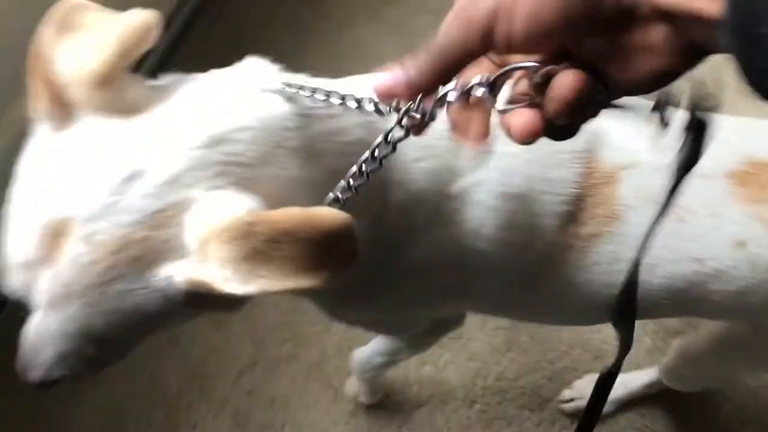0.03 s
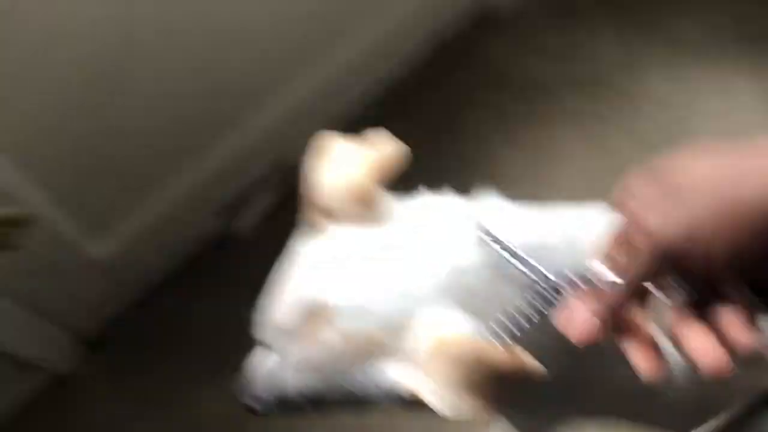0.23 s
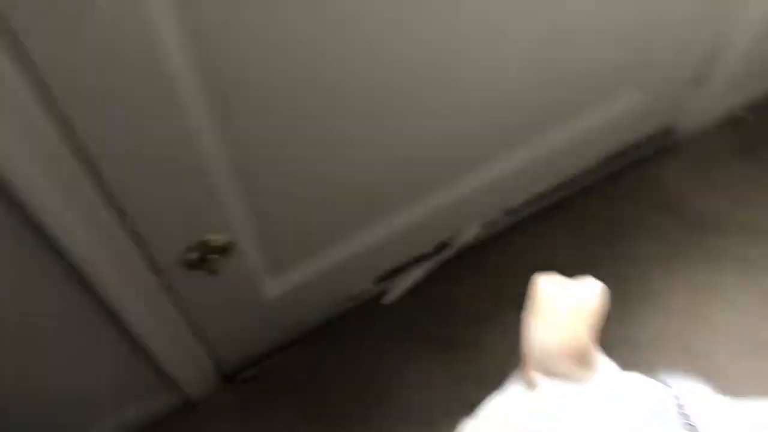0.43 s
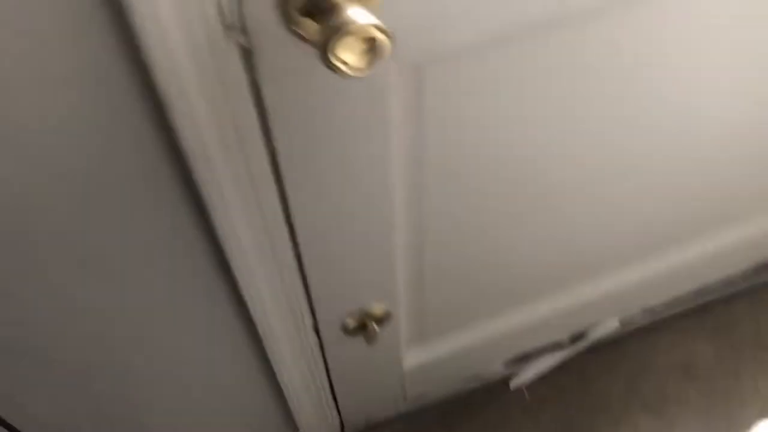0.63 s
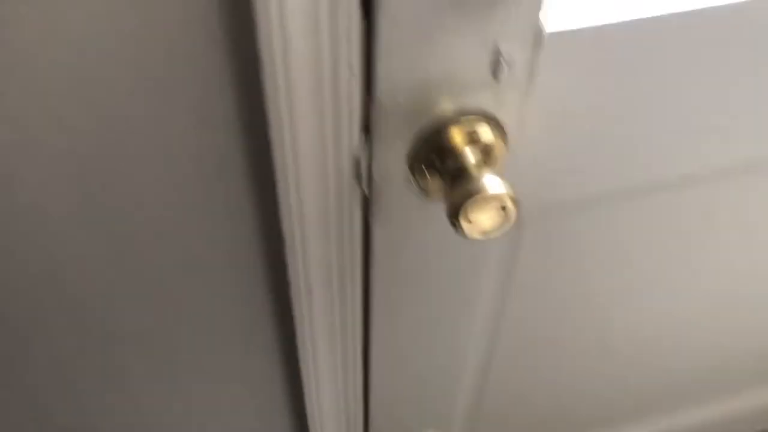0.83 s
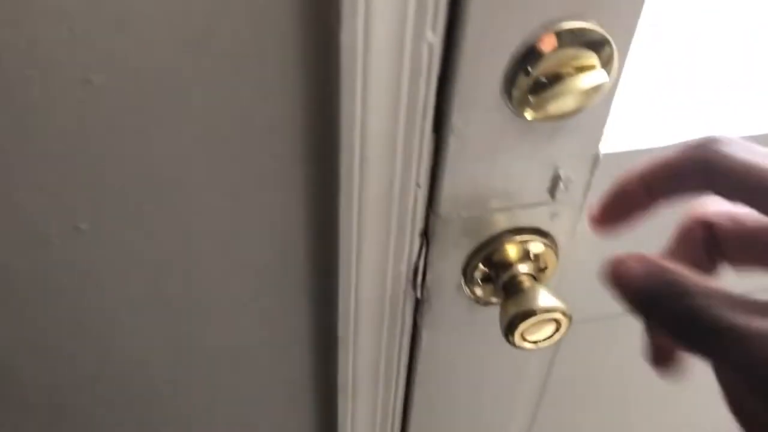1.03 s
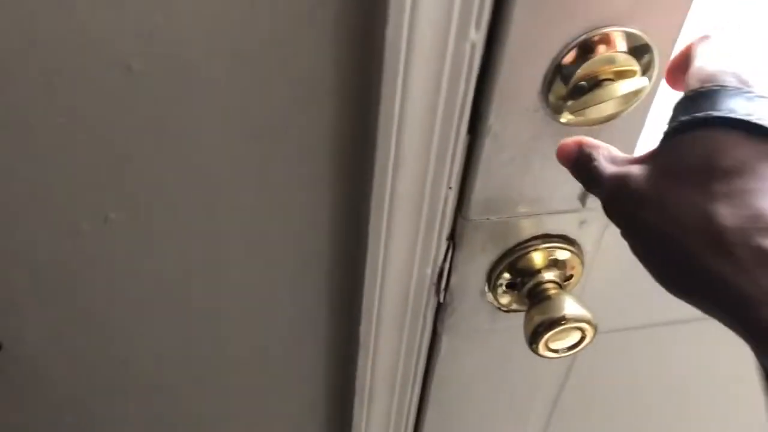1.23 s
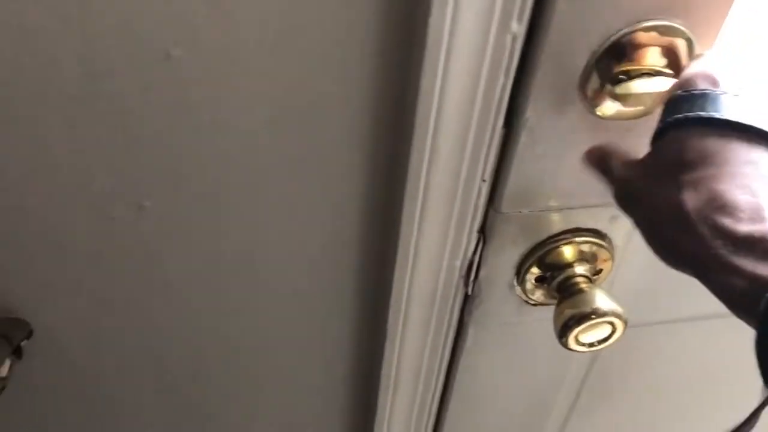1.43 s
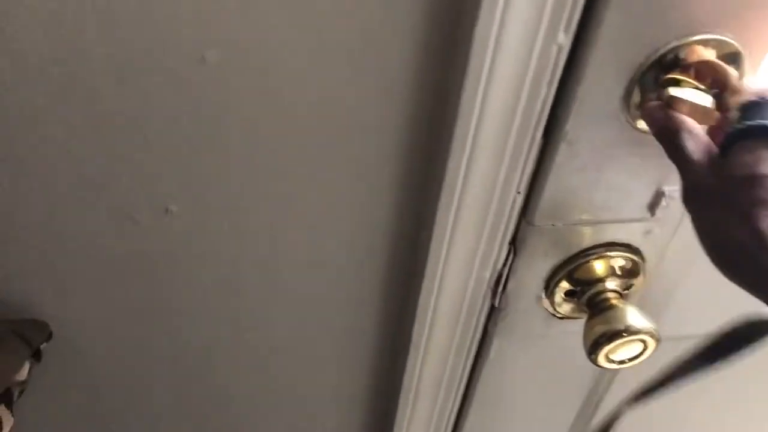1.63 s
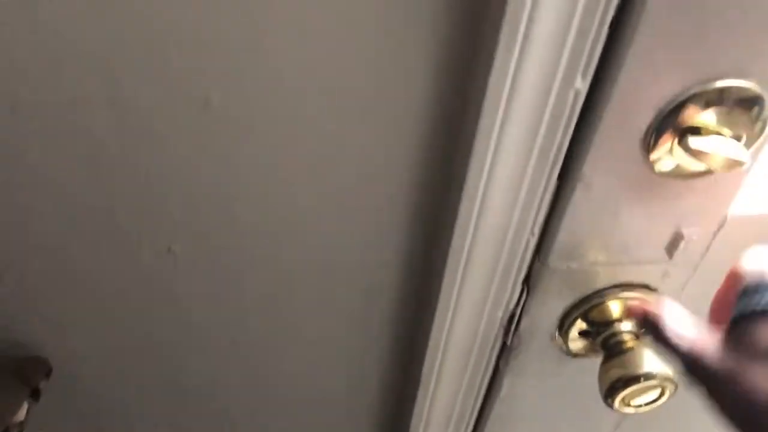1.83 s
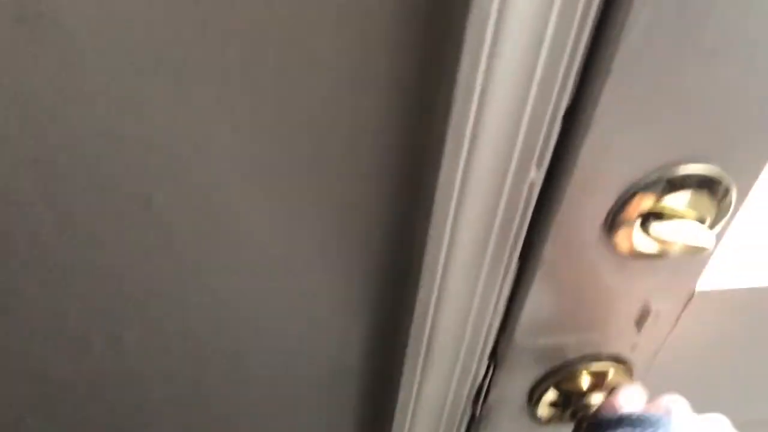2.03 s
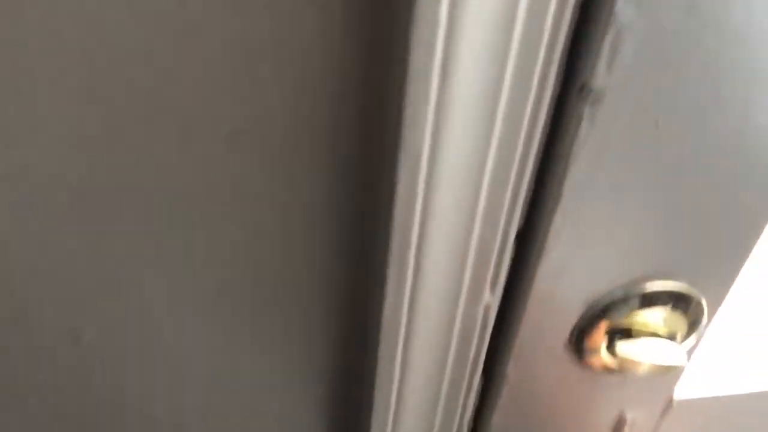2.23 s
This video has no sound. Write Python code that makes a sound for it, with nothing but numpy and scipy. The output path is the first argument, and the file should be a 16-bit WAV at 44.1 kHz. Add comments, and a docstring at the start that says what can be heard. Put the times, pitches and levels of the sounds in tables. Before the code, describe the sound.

A dog's metal chain collar clinks and snaps taut, then a deadbolt clicks open.

```python
"""Small metal ticks, sharp snaps and a high ping, then the clicks and wooden knocks of a door lock.
A dog's chain collar is pulled up by its leash: links tick, snap taut, slide and strike a steel ring.
A hand then turns a deadbolt, whose brass parts ring while the bolt knocks in the wooden door.
All is close by, in a small carpeted hall with a low ventilation rumble."""
import sys
import numpy as np
from scipy import signal
from scipy.fft import rfft, irfft
from scipy.io import wavfile
from scipy.ndimage import uniform_filter1d

SR = 44100
rng = np.random.default_rng(int(sys.argv[2]) if len(sys.argv) > 2 else 0)


def to_wav(s):
    """Save 16-bit WAV."""
    ch = np.atleast_2d(s).T  # columns
    pcm = np.round(np.clip(ch, -1, 1) * 32767)  # PCM
    wavfile.write(sys.argv[1], SR, pcm.astype(np.int16))


N = 100680
TIME = np.arange(N) / SR
BLOW_TIME = np.arange(8192) / SR


def amp(db):
    """Turns decibels into a gain."""
    return 10 ** (np.asarray(db) / 20)


def fade(t, ring_s):
    """A dying vibration: it falls by 60 dB in one ring time."""
    return np.exp(-np.log(1000) * t / ring_s)


def unit_rms(x):
    """Scales a sound to an average (rms) strength of one."""
    return x / np.sqrt(np.mean(x ** 2) + 1e-20)


def look_up(points, hz):
    """Reads between the rows of a table, on a log-frequency axis."""
    f, value = np.transpose(points)
    return np.interp(np.log(hz + 1), np.log(f + 1), value)


def level(points):
    """Gain over time from rows of t/s, level/dB."""
    return amp(np.interp(TIME, *np.transpose(points)))


def add(mix, start_s, sound):
    """Mixes a sound in at its start time."""
    part = mix[max(round(start_s * SR), 0):][:len(sound)]
    part += sound[:len(part)]


def coloured(x, spectrum):
    """Gives noise a tone colour, at an rms of one."""
    gain = amp(look_up(spectrum, np.fft.rfftfreq(len(x), 1 / SR)))
    return unit_rms(irfft(rfft(x) * gain, len(x)))


def resonance(centre_hz, height_db, octaves, tilt=0, pivot_hz=3000):
    """A bump in the tone colour, on a slope of tilt dB per octave."""
    def gain_db(hz):
        bump = height_db * np.exp(-.5 * (np.log2(hz / centre_hz) / octaves) ** 2)
        return bump + tilt * np.log2(np.maximum(hz / pivot_hz, 1 / 8))
    return gain_db


def resonate(x, spectrum):
    """Filters a burst so that its resonances ring after it, never before."""
    log_gain = np.log(amp(look_up(spectrum, abs(np.fft.fftfreq(len(x), 1 / SR)))))
    response = np.exp(np.conj(signal.hilbert(log_gain)))
    return np.fft.ifft(np.fft.fft(x) * response).real


def strike(modes, contact, contact_db, ring_s, emphasis=lambda hz: 0, body_db=0):
    """One blow: a sharp click, dying chatter and the object's own tones (its modes)."""
    t = BLOW_TIME
    bands = np.geomspace(100, 17000, 240)
    # the chatter is up to body_db louder near each mode
    bumps = [resonance(hz, body_db, octaves=.06)(bands) for hz, _, _ in modes]
    body = np.max([0 * bands] + bumps, axis=0)
    colour = np.column_stack([bands, look_up(contact, bands) + body + emphasis(bands)])
    click = amp(1) * np.exp(-t / .0005)
    envelope = (click + fade(t, ring_s)) * np.minimum(t / .0004, 1)
    chatter = resonate(envelope * rng.standard_normal(len(t)), colour)
    chatter *= amp(contact_db) * np.linalg.norm(envelope) / np.linalg.norm(chatter)
    tones = sum((-1) ** k * amp(db + emphasis(hz)) * fade(t, ring_s * life) * np.sin(2 * np.pi * hz * t)
                for k, (hz, db, life) in enumerate(modes))
    return chatter + tones


def background():
    """The ventilation rumbles and hums under the faint hiss of the hall."""
    # colour of the rumble and of the hiss: f/Hz, level/dB
    rumble_colour = [(40, -28), (58, -5), (80, 0.5), (130, -0.5), (180, -7.5), (290, -14.5), (380, -20.5),
                     (600, -29), (1100, -26), (2000, -36), (6000, -71.5)]
    hiss_colour = [(200, 9.5), (1500, 4.5), (3000, 1.5), (6000, -3), (10000, -9.5), (15500, -12)]
    # narrow bands of noise that make a wavering hum: f/Hz, width/Hz, level/dB
    hum_bands = [(81.5, 18.6, -49.5), (277.2, 27, -53.5), (444.6, 19, -66.5)]
    # loudness of the hiss: t/s, level/dB
    hiss_levels = [(0, -67), (1.1, -57), (1.32, -55.5), (1.72, -60.5), (2.05, -57.5), (2.28, -53)]
    hz = np.fft.rfftfreq(N, 1 / SR)
    hum = np.zeros(N)
    for centre_hz, width_hz, db in hum_bands:
        peak = 1 / (1 + (2 * (hz - centre_hz) / width_hz) ** 2)
        hum += amp(db) * unit_rms(irfft(rfft(rng.standard_normal(N)) * peak, N))
    rumble = amp(-40.5) * coloured(rng.standard_normal(N), rumble_colour)
    hiss = level(hiss_levels) * coloured(rng.standard_normal(N), hiss_colour)
    return rumble + hum + hiss


def hall(x, wet_db):
    """Adds the hall's short wash of echoes, in which the treble dies first."""
    # how long the hall rings: f/Hz, ring time/s
    ring_times = [(200, 0.45), (2000, 0.48), (7000, 0.19), (15000, 0.21)]
    hz, t, noise = signal.stft(rng.standard_normal(SR // 2), SR, nperseg=256)
    tail = signal.istft(noise * fade(t, look_up(ring_times, hz)[:, None]), SR, nperseg=256)[1]
    tail *= np.minimum(np.arange(len(tail)) / SR / .001, 1)  # builds up in 1 ms
    return x + amp(wet_db) * signal.fftconvolve(x, tail / np.linalg.norm(tail))[:N]


def first_echoes(x):
    """Adds the sound that bounces straight back from hand, door and walls."""
    # echoes: delay/s, level/dB
    echoes = [(.0017, -18), (0.0113, -22), (0.0142, -17.5)]
    out = x.copy()
    for delay_s, db in echoes:
        add(out, delay_s, amp(db) * x)
    return out


def sliding():
    """Chain and leash slide over fur and hand: many tiny contacts and a smooth rub."""
    # loudness of the slide: t/s, level/dB
    slide_levels = [(0, -53), (.12, -55.5), (.27, -55), (.33, -60), (.44, -53.5), (.53, -56), (.58, -56),
                    (.62, -40), (.68, -46), (.76, -48.5), (.83, -50.5), (.94, -46), (1.04, -59.5),
                    (1.15, -90)]
    # its colour: f/Hz, level/dB
    slide_colour = [(150, 8), (450, 3.5), (1500, 3.5), (3000, 5), (6000, 1), (9000, -0.5), (12000, -3),
                    (15000, -6.5)]
    contacts_per_s, spread_db = 1400, 4
    sizes = amp(spread_db * np.minimum(rng.exponential(1, N), 5)) * rng.choice([-1, 1], N)
    contacts = unit_rms(sizes * (rng.random(N) < contacts_per_s / SR))
    rub = rng.standard_normal(N)
    return level(slide_levels) * coloured(contacts + rub, slide_colour)


def links():
    """Slack links tick against each other, dulled by hand and fur, each with its own colour."""
    # link hits link: t/s, level/dB, resonance/Hz, ring time/s
    ticks = [(0.0757, -34, 13200, 0.013), (0.1333, -23, 5400, 0.018), (0.1512, -22.5, 7360, 0.017),
             (0.2174, -33, 13500, 0.0082), (0.2233, -23.5, 11000, 0.031), (0.2299, -20, 7900, 0.017),
             (0.2643, -34.5, 10200, 0.012), (0.2943, -37.5, 10300, 0.018), (0.4492, -31.5, 10700, 0.023),
             (0.46, -23.5, 10800, 0.017), (0.636, -45, 2400, 0.011), (0.698, -37, 5400, 0.021),
             (0.7148, -27.5, 2690, 0.026), (0.7359, -30.5, 2780, 0.015), (0.75, -37, 3010, .03),
             (0.7575, -31, 2840, 0.03), (0.775, -33.5, 3200, 0.02), (0.8407, -32, 10900, 0.011),
             (0.875, -31, 2600, 0.032), (0.8961, -27, 3320, 0.017), (.9144, -23, 3220, 0.014),
             (0.92, -26, 3280, 0.016), (0.9224, -25.5, 12500, 0.023), (1.4892, -42, 12000, .015),
             (1.514, -27.5, 14600, 0.01), (1.798, -42, 11300, 0.0091)]
    # colour of their contact noise: f/Hz, level/dB
    contact = [(300, -34), (1200, -12.5), (2300, -6.5), (4500, -2), (7000, -4), (12500, -3.5), (15200, 0.5),
               (16300, -1)]
    out = np.zeros(N)
    for start_s, db, centre_hz, ring_s in ticks:
        emphasis = resonance(centre_hz, height_db=9, octaves=.37)
        add(out, start_s, strike([], contact, db, ring_s, emphasis))
    return out


def fluttering(hz, flutter_hz):
    """A tone of the steel ring, whose pitch trembles as it swings against the chain."""
    wobble = unit_rms(uniform_filter1d(rng.standard_normal(N), round(.004 * SR)))
    return np.sin(2 * np.pi * np.cumsum(hz + flutter_hz * wobble) / SR)


def steel_ring():
    """A hanging ring sings on two close tones; each blow feeds them, and a leaning link chokes them."""
    # blows on the ring: t/s, level/dB, ring time/s, upper tone against lower/dB
    pings = [(.5865, -23.5, 0.036, 4), (0.698, -36.5, 0.12, 2), (0.7149, -22, 0.093, 2.5),
             (.748, -39, 0.12, 1), (0.7576, -33.5, 0.09, 8), (0.772, -33, 0.1, 6), (.778, -34, 0.11, -3),
             (0.786, -22, .07, -5), (0.79, -19.5, 0.08, -7), (0.842, -29.5, 0.022, 9.5),
             (0.8959, -24, 0.032, 0), (0.914, -24, 0.029, 3), (0.921, -24, 0.035, 4),
             (1.488, -36.5, 0.051, 3), (1.515, -12, 0.015, -25), (1.799, -40, 0.015, 8)]
    choke_times_s, choke_ring_s = [.741, .68], .042
    lower, upper, t = np.zeros(N), np.zeros(N), BLOW_TIME
    for start_s, db, ring_s, upper_db in pings:
        choked_s = sum(np.maximum(start_s + t - at, 0) for at in choke_times_s if at > start_s)
        blow = amp(db) * np.minimum(t / .0008, 1) * fade(choked_s, choke_ring_s)
        add(lower, start_s, blow * fade(t, ring_s))
        add(upper, start_s, blow * amp(upper_db) * fade(t, .36 * ring_s))
    return lower * fluttering(10290, flutter_hz=25) + upper * fluttering(10700, flutter_hz=45)


def snaps():
    """The chain runs to its end and rings briefly while pulled tight."""
    # tugs: t/s, level/dB, brightness/(dB per octave), ring time/s, resonance/Hz
    tugs = [(0.3817, -7, 5, 0.015, 7800), (0.5861, -8.5, -2, 0.017, 4600)]
    # tones of the tight chain: f/Hz, level/dB, ring time as a multiple of the tug's
    modes = [(4580, -20, .8), (4860, -19, .8), (7680, -15, 1.3), (13100, -19, .8), (13700, -22, .8),
             (14620, -15, .7), (15200, -14.5, .7)]
    # colour of its contact noise: f/Hz, level/dB
    contact = [(300, -22), (1400, -21), (2300, -9), (3500, -8.5), (5400, -6), (12000, -4), (15200, 5),
               (16300, -9)]
    out = np.zeros(N)
    for start_s, db, tilt, ring_s, centre_hz in tugs:
        emphasis = resonance(centre_hz, height_db=6, octaves=.13, tilt=tilt, pivot_hz=9150)
        snap = strike(modes, contact, contact_db=-4.5, ring_s=ring_s, emphasis=emphasis)
        add(out, start_s, amp(db) * snap)
    return out


def deadbolt():
    """The brass lock rings as it springs free, and clacks dully when the bolt presses on the door."""
    # moves of the bolt: t/s, metal level/dB, resonance/Hz, brightness/(dB per octave),
    # ring time/s, gain of the brass tones/dB, knock level/dB
    moves = [(1.409, -20, 3350, -4, 0.027, 4.5, -38.5), (1.426, -44, 3000, -5, 0.016, -8, -34),
             (1.4548, -32.5, 2980, -2.5, 0.011, -14, -51), (1.4575, -30, 1500, -14, 0.0091, -14, -19.5),
             (1.47, -39, 2500, -8, 0.023, -18, -47), (1.513, -27.5, 2950, 5, 0.046, -11, -25.5),
             (1.5838, -12.5, 3500, -0.5, 0.019, 3, -37), (1.598, -26.5, 5300, -8, 0.034, -23, -37),
             (1.606, -30, 5340, -1, 0.023, -12, -35), (1.615, -16, 4960, 1, 0.036, -26, -23),
             (1.6238, -26, 5200, -6, 0.043, -16, -25.5)]
    # tones of the lock and of the wooden door: f/Hz, level/dB, ring time as a multiple of the blow's
    lock_modes = [(1310, -19, 1.1), (1886, -10.5, .8), (2950, -12, .85), (3780, -11, .7)]
    door_modes = [(275, -17, 3), (445, -14, 0.8), (790, -8.5, 0.5), (1020, -9, 0.3)]
    # colour of their contact noise: f/Hz, level/dB
    lock_contact = [(300, -6.5), (1000, -6.5), (1900, 1.5), (3200, -6), (5400, 3.5), (7000, -0.5),
                    (15500, -7)]
    door_contact = [(100, -4), (320, 7), (900, 7.5), (1600, 1.5), (4000, -12), (16000, -44)]
    out = np.zeros(N)
    for start_s, metal_db, centre_hz, tilt, ring_s, brass_db, knock_db in moves:
        emphasis = resonance(centre_hz, height_db=6.5, octaves=.37, tilt=tilt)
        brass = [(hz, db + brass_db, life) for hz, db, life in lock_modes]
        click = strike(brass, lock_contact, contact_db=-6.5, ring_s=ring_s, emphasis=emphasis, body_db=9)
        knock = strike(door_modes, door_contact, contact_db=-5.5, ring_s=.031)
        add(out, start_s, amp(metal_db) * click + amp(knock_db) * knock)
    return out


def scene():
    """The collar, then the lock, over the background of the hall, in one channel."""
    collar = hall(links(), wet_db=-19.5)
    collar += hall(first_echoes(snaps()), wet_db=-16.5)
    collar += hall(steel_ring(), wet_db=-23)
    collar += sliding()
    lock = hall(deadbolt(), wet_db=-16.5)
    return (collar + lock + background())[None]


def record(dry):
    """Cuts the very highest treble, above 16200 Hz."""
    low_pass = signal.firwin(255, 16200, window=("kaiser", 8), fs=SR)
    return signal.oaconvolve(dry, low_pass[None], "same")


dry = scene()
out = record(dry)
to_wav(out)
```